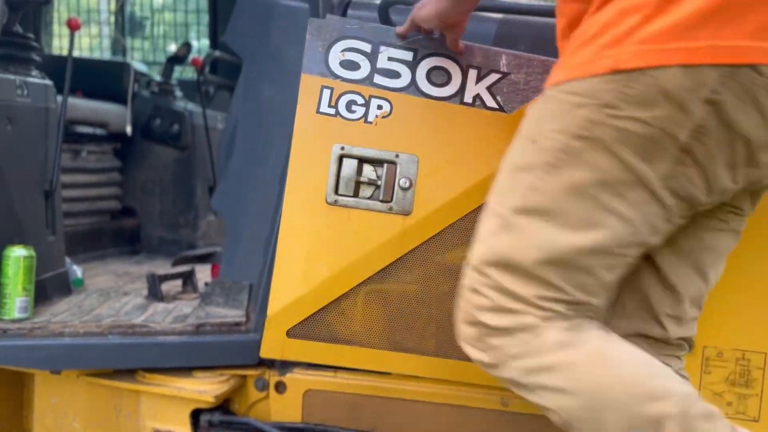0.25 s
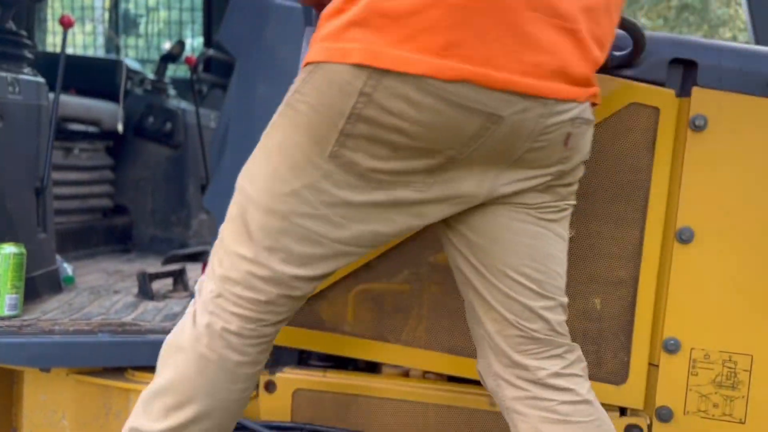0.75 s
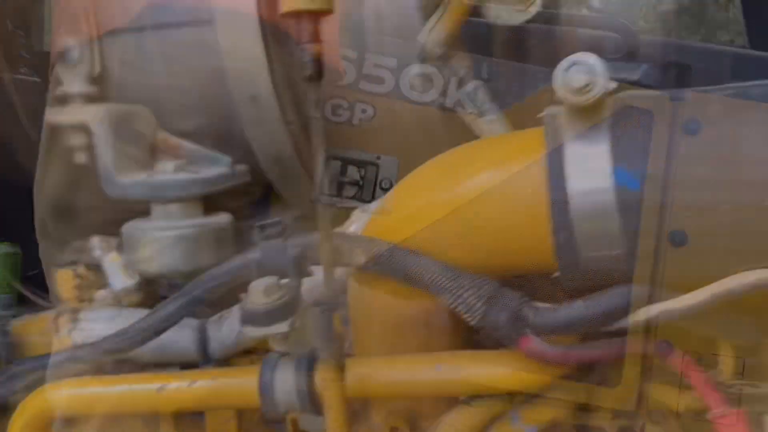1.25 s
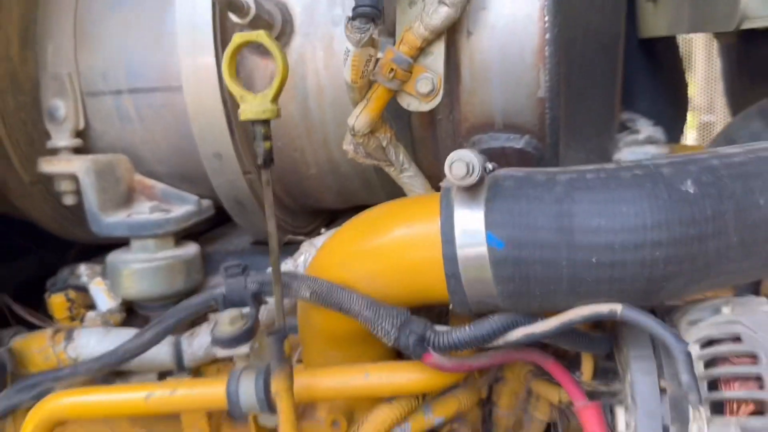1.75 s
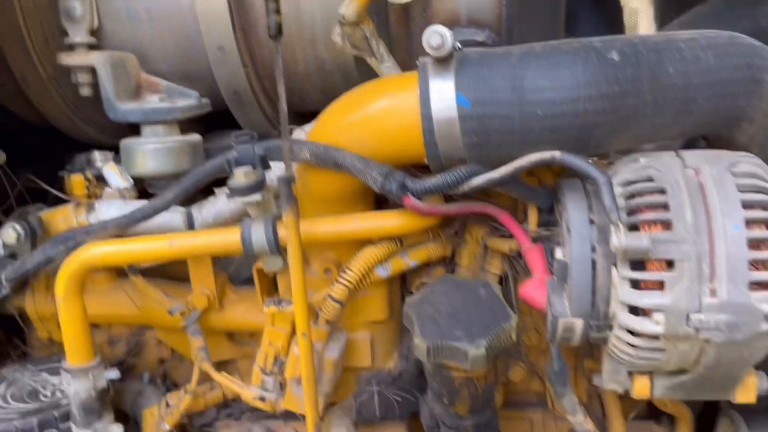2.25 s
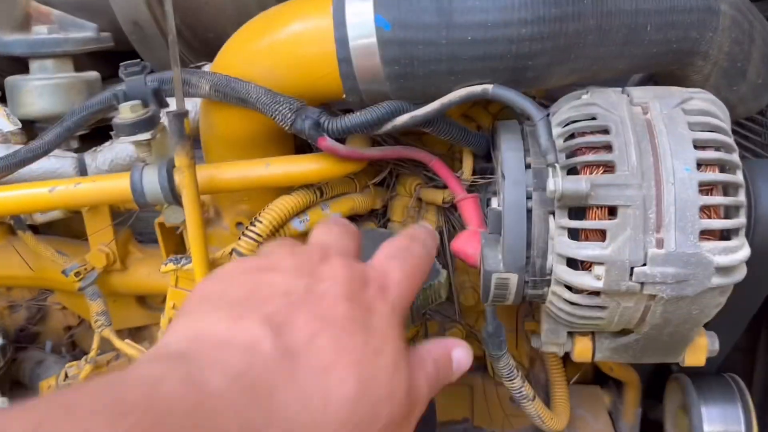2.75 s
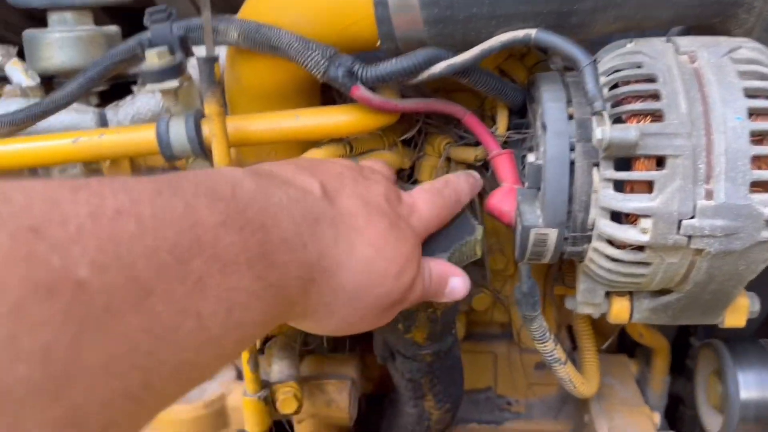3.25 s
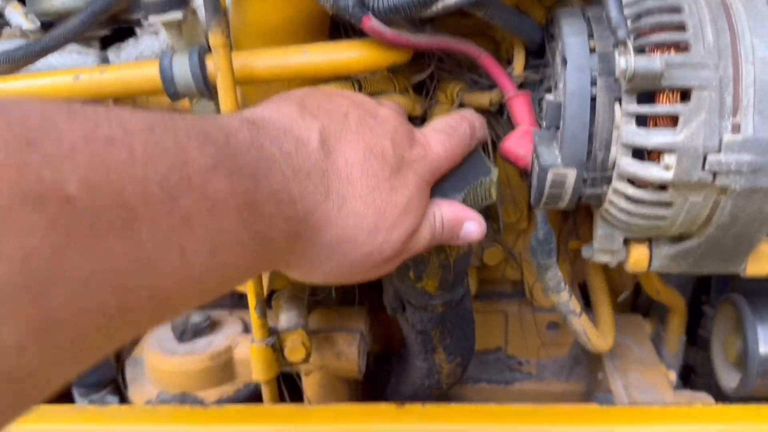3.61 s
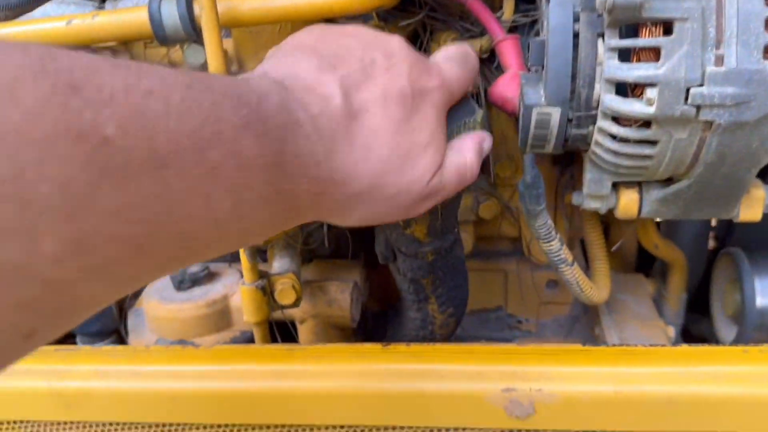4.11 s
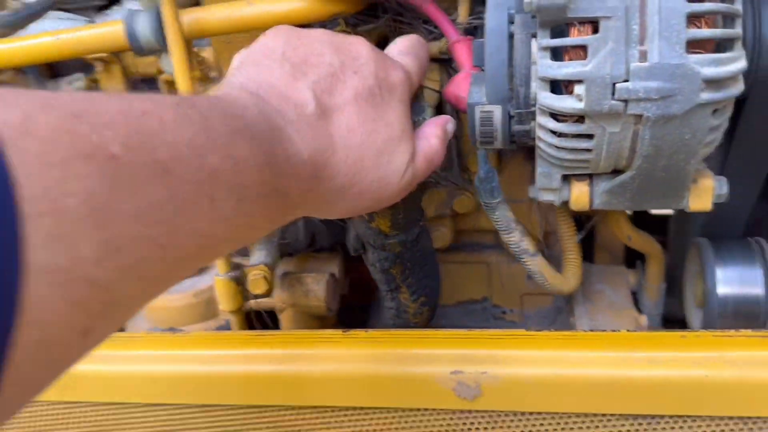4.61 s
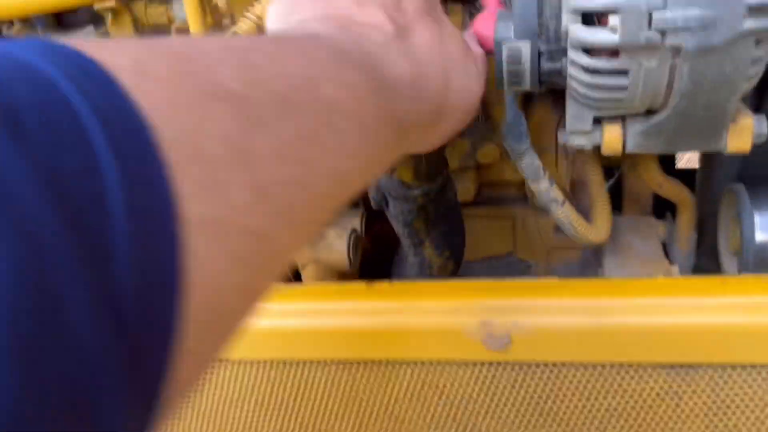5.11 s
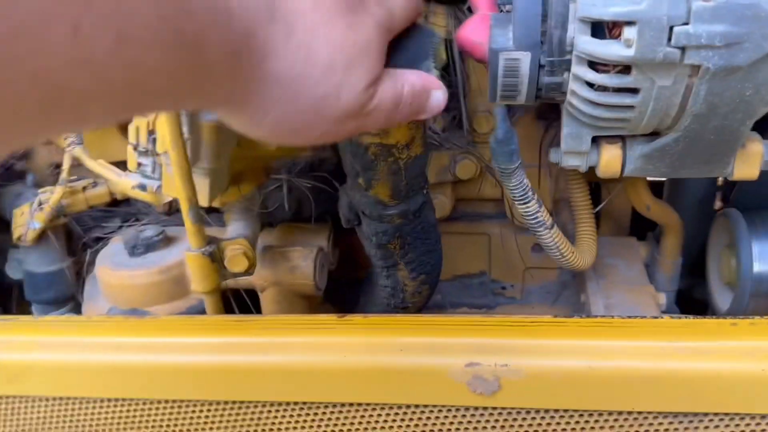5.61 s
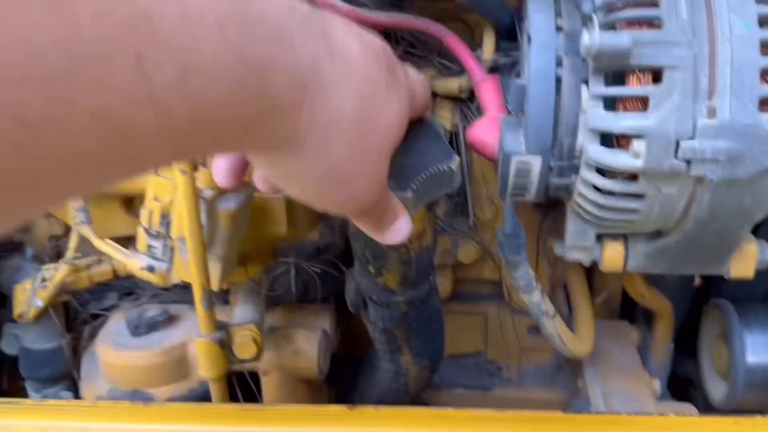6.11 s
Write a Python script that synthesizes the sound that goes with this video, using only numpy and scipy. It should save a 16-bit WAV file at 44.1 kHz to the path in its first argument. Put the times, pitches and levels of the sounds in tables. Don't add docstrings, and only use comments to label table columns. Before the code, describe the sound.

Quiet outdoor air with two hollow panel taps, faint birds and a gritty boot scrape, then an abrupt cut to a loud, close diesel idle.

```python
import sys
import numpy as np
from scipy import signal
from scipy.fft import rfft, irfft, next_fast_len
from scipy.io import wavfile
from scipy.ndimage import uniform_filter1d, map_coordinates

SR = 44100
rng = np.random.default_rng(int(sys.argv[2]) if len(sys.argv) > 2 else 0)


def how_loud(loudness_db):
    steps = np.asarray(loudness_db, float) / 20
    return 10 ** steps


def master(y):
    cut = np.clip(np.atleast_2d(y).T, -1, 1)
    pcm = np.round(cut * 32767)
    wavfile.write(sys.argv[1], SR, pcm.astype(np.int16))


N = 280476

CUT_S = .9662
FIRING_HZ = 29.998
# freq_hz, level_db (per Hz)
STEEL_COLOUR = [(120, -41), (200, -7.5), (450, -1.5), (875, -12.5), (1010, -3.5), (1110, -14),
                (1210, -15.5), (2860, -21.5), (3600, -51), (4680, -65), (7920, -120)]
# freq_hz, level_db (per Hz)
GRIT_COLOUR = [(880, -31), (1500, -28), (2350, -8), (2870, -6.5), (4370, -13.5), (7810, -8), (10600, -27),
               (15100, -19), (16400, -20)]
# start_s, attack_s, hold_s, level_db, release_db_per_s
DRAG_STROKE = (.7115, .006, .05, -28, 180)


def unit(x):
    return x / np.sqrt(np.mean(x ** 2) + 1e-20)


def along(points, hz):
    f, v = np.transpose(points)
    return np.interp(np.log(hz + 1), np.log(f + 1), v)


def wobble(rate):
    knots = rng.standard_normal(int(N * rate / SR) + 4)
    return map_coordinates(knots, [np.arange(N) * rate / SR])


def filtered(x, response):
    m = next_fast_len(N + SR // 2)
    return irfft(rfft(x, m) * response(np.fft.rfftfreq(m, 1 / SR)), m)[..., :N]


def causal(points):
    def response(hz):
        cepstrum = irfft(np.log(how_loud(along(points, hz))))
        cepstrum[1:len(hz) - 1] *= 2
        cepstrum[len(hz):] = 0
        return np.exp(rfft(cepstrum))
    return response


def noise(points):
    white = rng.standard_normal((2, N))
    return unit(filtered(white, lambda hz: how_loud(along(points, hz))))


def stroke(s, attack_s, hold_s, db, release_db):
    t = np.arange(N) / SR - s
    return np.clip(t / attack_s, 0, 1) * how_loud(db - release_db * np.maximum(t - attack_s - hold_s, 0))


def blows(s, size):
    at = np.clip(np.round(s * SR).astype(int), 0, N - 1)
    return np.array([np.bincount(at, row * (s < N / SR), N) for row in size])


def ring(x, hz, t60):
    r, w = how_loud(-60 / (t60 * SR)), 2 * np.pi * hz / SR
    return signal.lfilter([0, np.sin(w)], [1, -2 * r * np.cos(w), r * r], x)


def patchy(x, depth_db):
    z = signal.stft(x, nperseg=256)[2]
    field = rng.standard_normal(z.shape[1:])
    field = uniform_filter1d(field, size=4, axis=0)
    field = uniform_filter1d(field, size=5, axis=1)
    return unit(signal.istft(z * how_loud(depth_db * unit(field)), nperseg=256)[1][:, :N])


def air():
    # freq_hz, level_db (per Hz)
    rumble_colour = [(18, -39), (30, -5.5), (75, 1.5), (188, -1.5), (233, -6.5), (450, -18.5), (580, -47),
                     (990, -120)]
    # freq_hz, level_db (per Hz)
    yard_colour = [(180, -29), (300, -3), (968, -13.5), (1270, -13), (1730, -17), (2370, -14),
                   (2740, -16.5), (3660, -27.5), (7650, -32.5), (9500, -40), (12400, -73), (20900, -120)]
    breeze_db, breeze_dies_db_per_s, weight_db, yard_db = -46, 9, -19, -60.5
    low = how_loud(breeze_db - breeze_dies_db_per_s * np.arange(N) / SR) + how_loud(weight_db) * stroke(*DRAG_STROKE)
    return low * noise(rumble_colour) + how_loud(yard_db) * noise(yard_colour)


def cloth():
    # start_s, attack_s, hold_s, level_db, release_db_per_s
    swish_stroke = (.016, 0.06, 0.02, -62, 140)
    rest_db = -86.5
    return (how_loud(rest_db) + stroke(*swish_stroke)) * how_loud(1.5 * wobble(40)) * noise(GRIT_COLOUR)


def taps():
    # start_s, peak_db, ring_hz, tick_db
    contacts = [
        (0.03, -37, 487, -15),
        (0.129, -34, 470, -27),
        (0.68, -62.5, 401, 5),
    ]
    out, t = np.zeros((2, N)), np.arange(SR // 10) / SR
    grit, steel = noise(GRIT_COLOUR), noise(STEEL_COLOUR)
    for s, db, hz, tick_db in contacts:
        at = slice(int(s * SR), int(s * SR) + len(t))
        tone = np.sin(2 * np.pi * hz * t) * how_loud(-60 * t / 0.034) * (1 - np.exp(-t / .0012))
        rasp = how_loud(-10.5 - 60 * t / .06) * steel[:, at]
        tick = how_loud(tick_db - 1.5 - 60 * t / 0.033) * grit[:, at]
        out[:, at] += how_loud(db) * (tone + rasp + tick)
    return out


def birds():
    # delay_s, length_s, start_hz, glide_hz, level_db
    phrase = [
        (0, .03, 3350, -40, -7),
        (.06, .055, 3350, 20, -6),
        (.115, .066, 2940, -310, 1.5),
    ]
    # start_s, level_db
    sung = [
        (.14, -63),
        (.472, -66),
    ]
    # start_s, length_s, start_hz, glide_hz, level_db
    strays = [
        (.33, .05, 2690, 60, -66),
        (.45, .08, 4350, 50, -81),
    ]
    out = np.zeros(N)
    notes = [(s + delay, length, hz, glide, db + note_db)
             for s, db in sung for delay, length, hz, glide, note_db in phrase]
    for s, length, hz, glide, db in notes + strays:
        u = np.linspace(0, 1, int(length * SR))
        whistle = np.sin(2 * np.pi * np.cumsum(hz + glide * u) / SR)
        out[int(s * SR):][:len(u)] += how_loud(db + 5) * np.sin(np.pi * u) * whistle
    return out * how_loud(3 * wobble(91) - 3) * [[1], [.6]]


def scrape():
    # start_s, attack_s, hold_s, level_db, release_db_per_s
    scuff_stroke = (.88, 0.1, .03, -52.5, 100)
    # start_s, peak_db, rasp_db
    slip_events = [
        (0.7117, -45, 19.5),
        (0.7403, -41, 16.5),
        (0.7656, -34, -7),
        (0.798, -35.5, 5),
        (0.8356, -42, -6),
        (0.9153, -42, 2),
    ]
    drag_grit_db, scuff_grit_db = -21.5, -1
    drag, scuff = stroke(*DRAG_STROKE), stroke(*scuff_stroke)
    s, db, rasp_db = np.transpose(slip_events)

    def slips(size_db, t60):
        decay = how_loud(-60 * np.arange(SR // 3) / SR / t60)
        return signal.fftconvolve(blows(s, [how_loud(size_db)])[0], decay)[:N]

    rasp = how_loud(-9.5) * (drag + scuff) + slips(db + rasp_db - 11.0, t60=0.17)
    body = rasp * noise(STEEL_COLOUR)[0] * [[1], [1.5]]
    spit = how_loud(drag_grit_db) * drag + how_loud(scuff_grit_db) * scuff + slips(db - 9.5, t60=0.057)
    return (body + spit * noise(GRIT_COLOUR)) * how_loud(1.5 * wobble(260))


def yard():
    return (air() + cloth() + taps() + birds() + scrape()) * (np.arange(N) < CUT_S * SR)


def firings(hunt_s):
    first_s = .9584
    s = first_s + np.arange(170) / FIRING_HZ
    return s + hunt_s * wobble(2.5)[np.clip((s * SR).astype(int), 0, N - 1)]


def exhaust(s, scatter_db, jitter_s):
    # multiple_of_firing_rate, level_db
    harmonics = [(2, -10.5), (3, 2.3), (4, -3.5), (5, -6), (6, -7.5), (7, -11), (8, -13.5)]
    chance = rng.standard_normal((len(s), 3)).T
    pipe = [(35, -53)] + [(k * FIRING_HZ, db) for k, db in harmonics] + [(330, -26.5), (560, -57), (1500, -98)]
    lead_s = .003
    pulses = blows(s - lead_s + jitter_s * chance[0], -how_loud(scatter_db * chance[1:]))
    return unit(filtered(pulses, causal(pipe)))


def fan():
    # freq_hz, level_db (per Hz)
    fan_colour = [(24, -45), (40, -15), (70, -13), (104, -3), (315, -7.5), (1140, -20), (1420, -30),
                  (2600, -29.5), (3300, -37.5), (8500, -41), (9640, -47.5), (11200, -54), (13000, -42),
                  (16400, -51)]
    return how_loud(-9.5 + 0.59 * wobble(14)) * noise(fan_colour)


def block(s, scatter_db, jitter, valve_db):
    # freq_hz, t60_s, lag_s, cylinder_1_db, cylinder_2_db, cylinder_3_db, cylinder_4_db
    block_modes = [(202.2, 0.11, 0.0267, -9.5, -14, -8.5, -10.5),
                   (261.4, 0.11, 0.0208, -10.2, -13, -10.6, -10.5),
                   (389.3, 0.045, .0232, -21, -6, -22.5, -9), (459.4, 0.053, 0.033, -27, -15.5, -22, -14.5),
                   (649, 0.066, .0109, -12, -45, -12, -31), (697, 0.03, 0.01376, -14, -27, -9, -24),
                   (854, 0.07, 0.01177, -18, -21, -30, -25), (914.8, 0.085, .0125, -29, -27, -16.5, -21),
                   (1127, 0.045, 0.00934, -15.5, -17.5, -24, -24),
                   (1289, 0.048, 0.0058, -17.5, -21, -31, -28), (1632, 0.05, .008, -41, -25, -23.5, -37),
                   (2200, 0.028, .009, -27.5, -34.5, -38, -36), (2605, 0.057, .009, -32.5, -29, -23.5, -30),
                   (4270, 0.021, .008, -26, -40, -23, -18), (4573, 0.031, .009, -29.5, -33, -24.5, -32.5),
                   (5400, 0.016, .009, -48, -34, -39, -38), (7130, 0.051, .008, -42, -41, -39, -31)]
    out = np.zeros((2, N))
    for hz, t60, lag, *cylinder_db in block_modes:
        chance = rng.standard_normal((len(s), 6)).T
        spread_db = scatter_db * min(.6 + hz / 1500, 3)
        firing_s = s + lag + jitter / np.sqrt(hz) * chance[0]
        firing_db = np.resize(cylinder_db, len(s)) + spread_db * chance[1:3]
        valve_s = s + lag + .015 + .006 * np.resize(chance[3, :4], len(s))
        tap_db = np.mean(cylinder_db) + valve_db - 12.6 * (hz < 500) + 2.3 * chance[4:]
        struck = blows(firing_s, how_loud(firing_db)) + blows(valve_s, how_loud(tap_db))
        push = uniform_filter1d(struck, int(SR / hz / 2))
        out += 2 * (ring(push, hz, t60) - 0.72 * ring(push, hz, 0.013))
    return out


def knock(s, scatter_db, jitter_s):
    # lag_s, low_band_db, high_band_db
    cylinder_knock = [(0.0076, -19, -19.5), (0.0067, -18, -17.5), (0.0049, -18.5, -15), (0.0054, -16, -17)]
    # freq_hz, level_db (per Hz)
    knock_low_colour = [(790, -27), (1350, -5), (1620, 0.5), (1990, -5), (2570, -4.5), (3350, -10),
                        (4410, -6), (6500, -17.5), (8450, -42), (14300, -120)]
    # freq_hz, level_db (per Hz)
    knock_high_colour = [(3240, -48), (5500, -1), (7070, -0.5), (8330, -2), (9250, -6.5), (11200, -24),
                         (12000, -8), (13000, -3.5), (14900, -0.5), (15800, -3), (16400, -30)]
    lag, low_db, high_db = np.resize(cylinder_knock, (len(s), 3)).T
    chance = rng.standard_normal((len(s), 3)).T
    t = np.arange(SR // 20) / SR
    # colour, level_db, rise_s, hold_s, fall_db_per_s, random level
    bands = [(knock_low_colour, low_db - 6, .003, .007, 800, chance[1]),
             (knock_high_colour, high_db - 13, .0018, .005, 1100, chance[2])]
    out = 0
    for colour, db, rise, hold, fall_db, luck in bands:
        shape = np.minimum(t / rise, 1) * how_loud(-fall_db * np.maximum(t - hold, 0))
        starts = blows(s + lag + jitter_s * chance[0], [how_loud(db + scatter_db * luck)])[0]
        bursts = signal.fftconvolve(starts, shape)[:N]
        grain = how_loud(1.45 * wobble(500))
        out = out + bursts * grain * patchy(noise(colour), depth_db=2.1)
    return out


def engine():
    settled_db, overshoot_db, settle_s = -15, 3, 0.54
    s = firings(hunt_s=.00012)
    parts = how_loud(-0.96) * exhaust(s, scatter_db=0.0, jitter_s=.00008) + fan()
    parts += how_loud(7) * block(s, scatter_db=1.1, jitter=0.0018, valve_db=-8.5)
    parts += how_loud(7) * knock(s, scatter_db=.9, jitter_s=0.00065)
    since = np.arange(N) / SR - CUT_S
    gain_db = settled_db + overshoot_db * np.exp(-np.maximum(since, 0) / settle_s)
    return how_loud(gain_db) * np.clip(since / 0.00022, 0, 1) * parts


def scene():
    # freq_hz, level_db
    port_difference = [(60, -31), (95, -34), (180, -21.5), (600, -9.5), (1290, -2), (1500, 4.5), (1900, -6.5),
                       (2550, -1), (4400, -4), (6800, -1),
                       (7400, 4), (8600, -10), (9800, 5.5), (11000, 13.5), (12200, 4.5), (13400, -5),
                  (14600, -12), (15400, -11)]
    mid, other = yard() + engine()
    side = filtered(0.19 * mid + 0.84 * other,
                    lambda hz: how_loud(along(port_difference, hz)) * np.exp(1.3j))
    return np.array([mid + side, mid - side])


def band_limit(x):
    return signal.sosfilt(signal.butter(12, 16510, fs=SR, output="sos"), x)


def record(dry):
    top_hz = 15950
    heard = filtered(dry, lambda hz: 1j * hz / (30 + 1j * hz) * (hz < top_hz))
    return band_limit(heard)


dry = scene()
out = record(dry)
master(out)
```